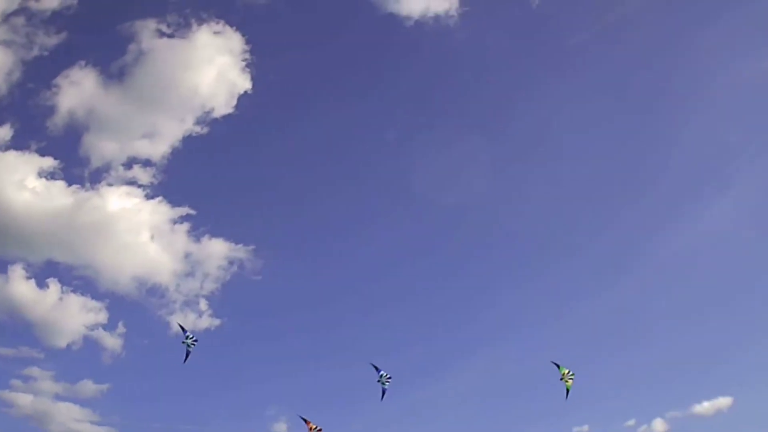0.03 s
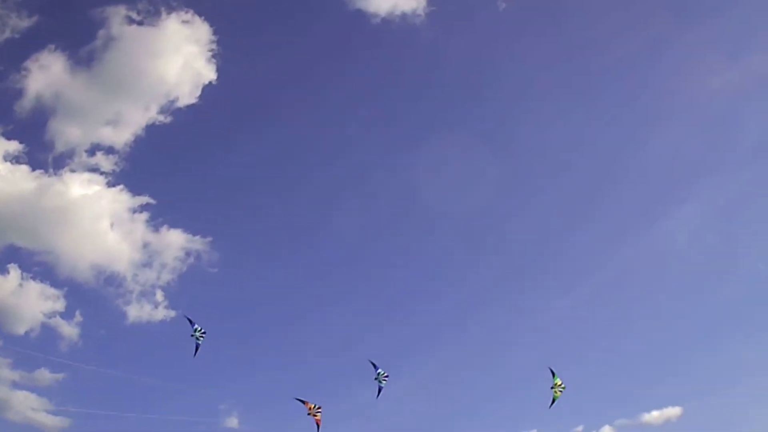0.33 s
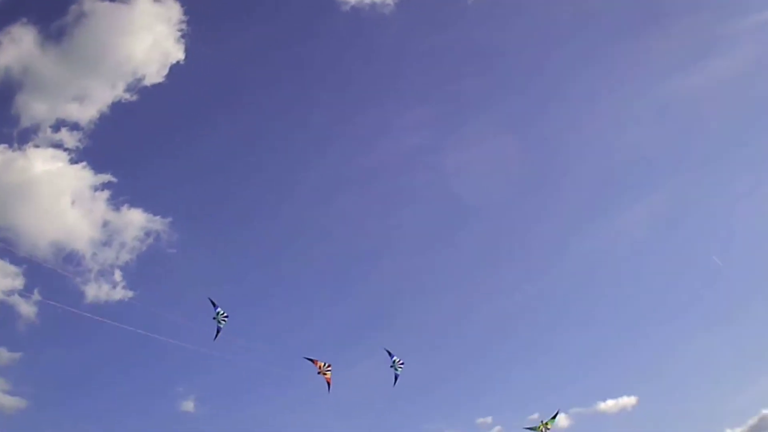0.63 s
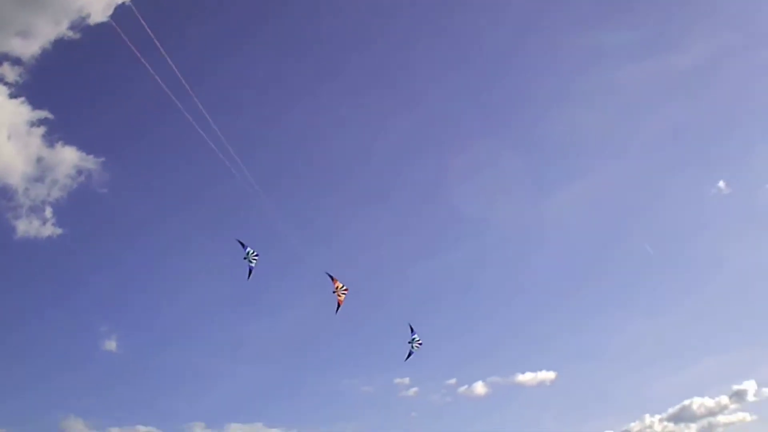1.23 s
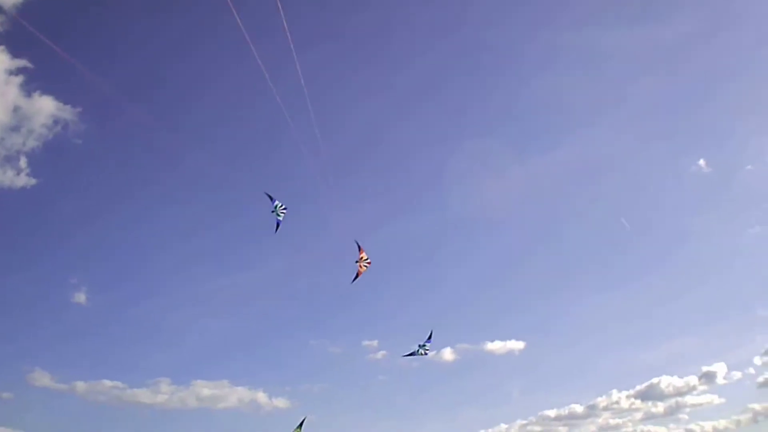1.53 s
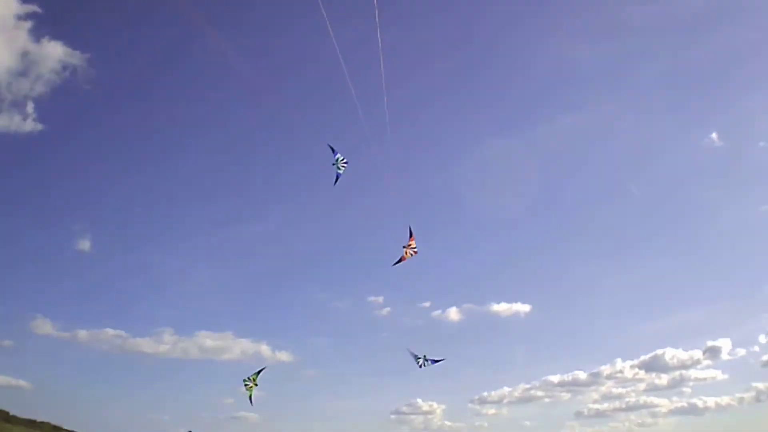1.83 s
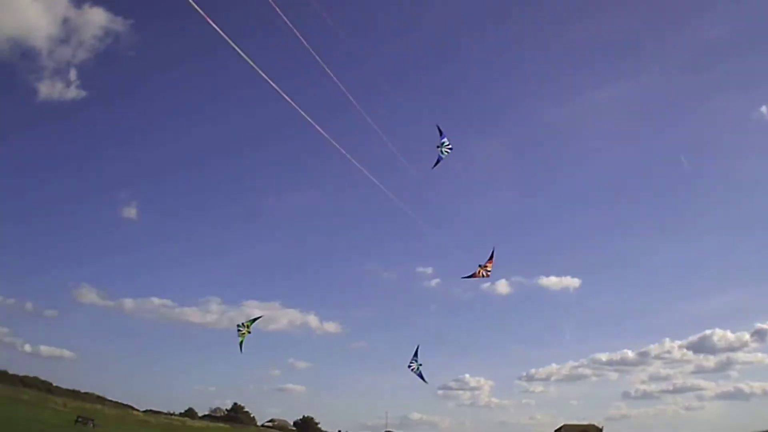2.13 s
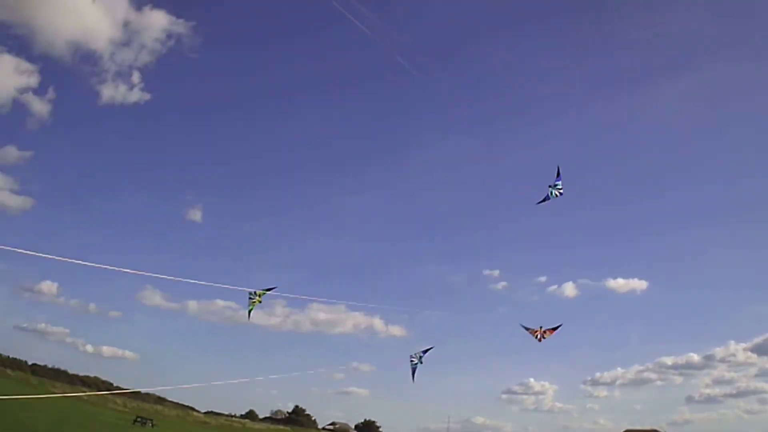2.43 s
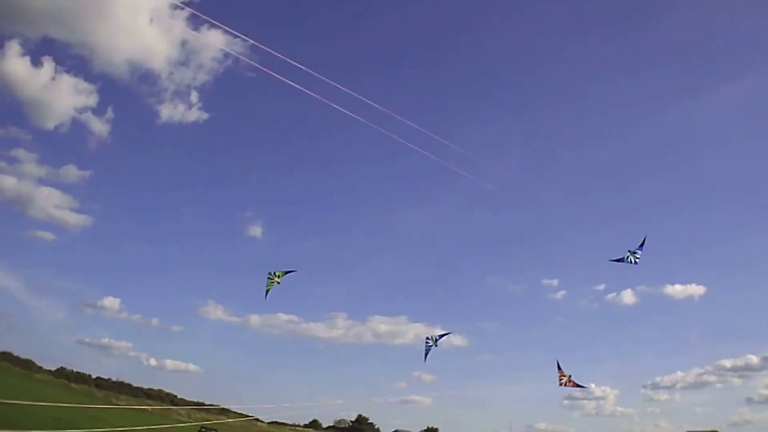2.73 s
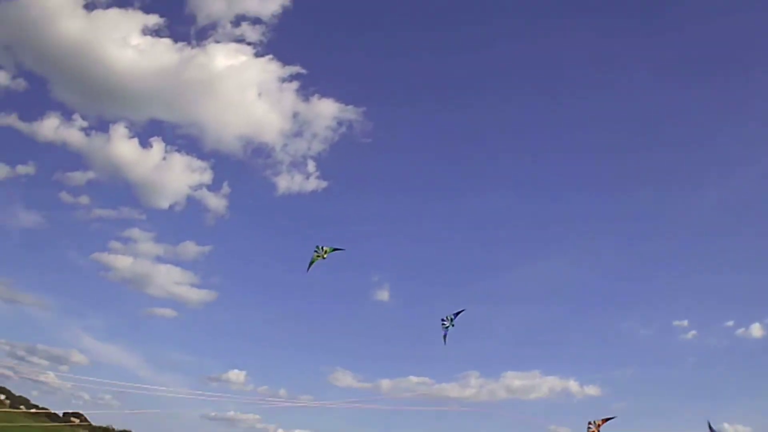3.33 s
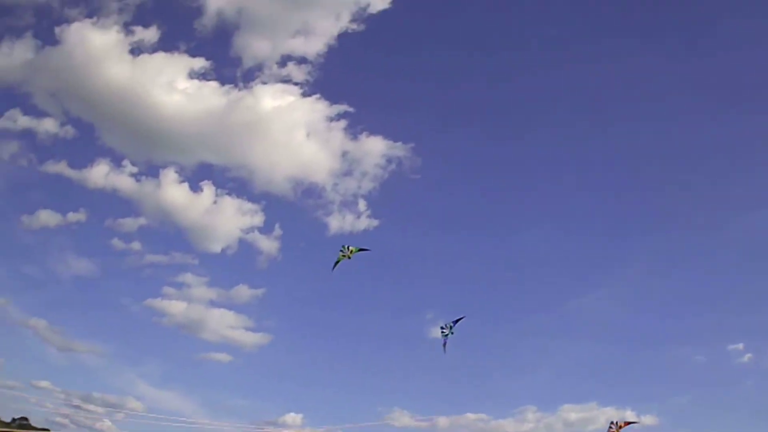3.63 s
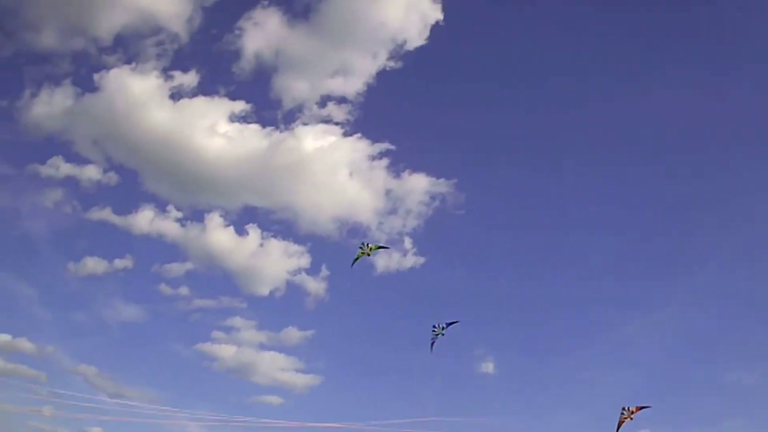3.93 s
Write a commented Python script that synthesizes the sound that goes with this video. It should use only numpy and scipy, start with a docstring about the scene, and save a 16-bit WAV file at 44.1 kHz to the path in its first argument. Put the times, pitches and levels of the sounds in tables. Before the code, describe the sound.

Stunt kites roar and rattle through the air, with gusts buffeting the microphone.

```python
"""A rattling roar over a rush of air: four stunt kites race across a windy hillside. Each sail's trailing
edge flutters about a hundred times a second, every flip a snap, strong and weak in turn, with a few hard
cracks. The ground mirrors the sound, so the roar phases as the kites dive and climb. Taut lines hiss
and whistle. Gusts buffet the microphone and overload it, and the camera adds a faint whine."""
import sys
import numpy as np
from scipy import signal
from scipy.fft import rfft, irfft
from scipy.io import wavfile
from scipy.ndimage import uniform_filter1d, map_coordinates

SR = 44100
rng = np.random.default_rng(int(sys.argv[2]) if len(sys.argv) > 2 else 0)


def log_audio(samples):
    """Write samples as a 16-bit WAV file to the path given in sys.argv[1]."""
    # one column per channel
    frames = np.atleast_2d(samples).T
    # limit to full scale, then quantise
    limited = np.clip(frames, -1, 1)
    pcm = np.round(limited * 32767).astype(np.int16)
    wavfile.write(sys.argv[1], SR, pcm)


N = 176400


def undb(db):
    """Decibels to gain."""
    return 10 ** (np.asarray(db) / 20)


def unit(x):
    """Scale to rms 1."""
    return x / np.sqrt(np.mean(x ** 2))


def curve(table, column=1):
    """One table column, linearly interpolated in time."""
    rows = np.array(table, float)
    return np.interp(np.arange(N) / SR, rows[:, 0], rows[:, column])


def wander(rate_hz):
    """Smooth random drift, rate_hz new values a second; rms 1."""
    hold = max(int(SR / rate_hz), 1)
    steps = np.repeat(rng.standard_normal(N // hold + 1), hold)
    return unit(uniform_filter1d(steps, hold)[:N])


def colour(x, spectrum):
    """Minimum-phase filter through (f/Hz, gain/dB) points; output rms 1."""
    hz, db = np.array(spectrum, float).T
    size = 2 * N
    bins_hz = np.maximum(np.arange(N + 1) * SR / size, 1)
    gain = undb(np.interp(np.log(bins_hz), np.log(hz), db))
    cepstrum = irfft(np.log(gain))
    cepstrum[1:N] *= 2
    cepstrum[N + 1:] = 0
    return unit(irfft(rfft(x, size) * np.exp(rfft(cepstrum)))[:N])


def steady(x, span_s):
    """Even out slow swells: running rms near 1."""
    return x / np.sqrt(uniform_filter1d(x ** 2, max(int(span_s * SR), 1)) + 1e-9)


def hiss_band(centre_hz, width_hz):
    """Noise band round a fixed or gliding centre; rms 1."""
    lowpass = signal.butter(2, width_hz / 2, fs=SR, output="sos")
    baseband = signal.sosfilt(lowpass, rng.standard_normal(N))
    return unit(baseband * np.cos(2 * np.pi * np.cumsum(centre_hz * np.ones(N)) / SR))


# Snap spectrum: f/Hz, relative level/dB
SAIL_SPECTRUM = [(100, -19), (250, -9), (450, -7), (750, -4), (980, 0.5), (1150, 1), (1450, -5.5),
                 (1850, -5), (2200, -11.5), (2700, -13), (3450, -23.5), (3850, -15.5), (4200, -17.5),
                 (4550, -29), (5200, -27), (7000, -39.5), (10000, -51.5), (15000, -80)]

def snaps(starts, gains, size=400):
    """Cloth pulled taut: a pulse, sharper or softer, that swings out and back, then a short shiver."""
    decay_s, decay_spread = .00003, .25
    shiver_db, shiver_s = -19.5, .0011
    swing_hz, swing_width_hz = 1420, 2220
    noise = rng.standard_normal((len(starts), size + 1))
    age_s = np.arange(size) / SR
    pulse = np.exp(-age_s / (decay_s * np.exp(decay_spread * noise[:, :1])))
    shiver = undb(shiver_db) * noise[:, 1:] * np.exp(-age_s / shiver_s)
    shapes = pulse / pulse.sum(axis=1, keepdims=True) + shiver
    places = np.maximum(starts.astype(int), 0)[:, None] + np.arange(size)
    pulls = np.bincount(places.ravel(), (shapes * gains[:, None]).ravel(), N)[:N]
    swing = signal.lfilter(*signal.iirpeak(swing_hz, swing_hz / swing_width_hz, fs=SR), pulls)
    return colour(pulls - 2 * swing, SAIL_SPECTRUM)


def trailing_edge(rate_hz, odd_snap_db, count=560):
    """A sail's edge flutters: one snap per flip, strong and weak in turn, no two alike."""
    drift, scatter_db, jitter_s = .008, 3.5, .0001
    flips = np.cumsum(rate_hz * (1 + drift * wander(6))) / SR
    lateness, strength = rng.standard_normal((count, 2)).T
    order = np.arange(count)
    starts = np.searchsorted(flips, order + rng.random())
    alternation_db = odd_snap_db[np.minimum(starts, N - 1)] * (order % 2)
    gains = undb(alternation_db + scatter_db * np.clip(strength, -2, 1)) * (starts < N)
    return snaps(starts + jitter_s * SR * lateness, gains)


def ground_bounce(x, elevation_deg, mic_height_m=1.6, bounce_db=-10, sound_m_s=343):
    """Direct sound plus its bounce off the grass, which lags more the higher the kite flies."""
    lag_s = 2 * mic_height_m * np.sin(np.radians(elevation_deg)) / sound_m_s
    bounce = map_coordinates(x, [np.arange(N) - lag_s * SR], order=3, mode="mirror")
    return unit(x + undb(bounce_db) * bounce)


# Air past sails and lines: f/Hz, relative level/dB
RUSH_SPECTRUM = [(150, -7), (400, 1.5), (750, -0.5), (1120, -1.5), (1500, -3.5), (2000, -6.5), (3450, -22),
                 (4000, -14.5), (4600, -23), (7000, -38.5), (10000, -42), (15000, -50.5)]

def kite(rate_hz, odd_snap_db, elevation_deg, rush_db=-5.5, surge_db=1.73, surge_hz=4.67):
    """Flutter and rushing air over the ground, surging as the sail fills and slackens."""
    sail = steady(trailing_edge(rate_hz, odd_snap_db), span_s=.13)
    rush = undb(rush_db) * colour(rng.standard_normal(N), RUSH_SPECTRUM)
    return ground_bounce(sail + rush, elevation_deg) * undb(surge_db * wander(surge_hz))


# Nearest kite's flutter, rate set by airspeed: t/s, rate/Hz, mix level/dB, odd-snap gain/dB (all kites)
FLUTTER = [(0, 96, -1, -8.5), (.18, 100, -4.5, 0), (.35, 106, -2.5, 0), (.58, 113, -4, -5),
           (.7, 114.5, -7.5, -14), (.8, 117, -2, -4.5), (.95, 113.6, 0, -10), (1.12, 112, -4, -8),
           (1.28, 111.4, -0.5, -1), (1.55, 106.6, 0, -3), (1.73, 118.7, 3.5, -10.5), (2.2, 98, -6, 1),
           (2.42, 97.7, -0.5, -15), (2.55, 93, -2.5, 0), (2.7, 99, 1, -3), (2.88, 93, -4, 5.5),
           (3.06, 106, 0, -9.5), (3.2, 113, 0.5, -5.5), (3.38, 108.6, -6.5, -7), (3.7, 104, -2.5, -4),
           (4, 103, -1.5, -4)]
# Other kites: rate/nearest rate, mix level/dB
OTHER_KITES = [(1.04, -6.5), (.93, -6.5), (.985, -7.5)]
# Flight paths: t/s, elevation/deg of kites 1 (nearest) to 4
ELEVATION_DEG = [(0, 27.3, 10.7, 24.7, 19), (.75, 26, 22, 22, 9.4), (1.25, 26, 22, 17, 4),
                 (1.7, 33.7, 26, 9, 4.86), (2.25, 24.8, 14.8, 7.7, 16), (2.75, 11.9, 6.7, 12.11, 19),
                 (3.25, 19.6, 4.71, 7.8, 22), (4, 26.6, 5, 3.6, 29.5)]
# Roar envelope: t/s, relative level/dB
ROAR_DB = [(0, -23), (.3, -20), (.62, -22.5), (.72, -22), (.92, -20), (1.0, -23), (1.12, -19),
           (1.27, -22.5), (1.4, -22), (1.75, -24), (2.13, -23), (2.2, -25), (2.3, -25.5), (2.4, -24),
           (2.6, -21.5), (2.95, -23.5), (3.1, -22), (3.5, -20.5), (3.8, -23.5), (4, -25)]
# Treble shelf on the roar: t/s, gain/dB
TREBLE_DB = [(0, 2), (.2, -2), (.65, -1), (.93, 0), (1.15, -.5), (1.6, -2), (1.9, 0.5), (2.3, -1),
             (2.55, -2), (2.7, -5.5), (3, -2.5), (3.12, -1.5), (3.65, -1), (4, 3)]

def kites(trim_db=1.07, shelf_hz=2600):
    """Four kites on their own paths merge into one roar of varying level and brightness."""
    rate_hz, odd_snap_db = curve(FLUTTER), curve(FLUTTER, 3)
    roar = undb(curve(FLUTTER, 2)) * kite(rate_hz, odd_snap_db, curve(ELEVATION_DEG))
    for column, (ratio, db) in enumerate(OTHER_KITES, start=2):
        own_rate_hz = rate_hz * ratio * (1 + .03 * wander(1.5))
        roar += undb(db) * kite(own_rate_hz, odd_snap_db, curve(ELEVATION_DEG, column))
    roar = steady(roar, span_s=.35)
    treble = signal.sosfiltfilt(signal.butter(2, shelf_hz, "high", fs=SR, output="sos"), roar)
    roar += treble * (undb(curve(TREBLE_DB)) - 1)
    return undb(curve(ROAR_DB) + trim_db) * roar


# Gust and eddy envelopes: t/s, relative level/dB
GUST_DB = [(0, -22.5), (.07, -16.5), (.2, -25.5), (.3, -13.5), (.39, -21), (.5, -16), (.74, -16.5),
           (.96, -14), (1.0, -19.5), (1.28, -24), (1.38, -22), (1.62, -15), (1.73, -21.5), (1.98, -23),
           (2.03, -11.5), (2.12, -18.5), (2.21, -6), (2.3, -10.5), (2.38, -12.5), (2.52, -14.5),
           (2.7, -11.5), (2.8, -14), (3.05, -7.5), (3.22, -11.5), (3.3, -14), (3.6, -16.5), (3.8, -13.5),
           (3.87, -21), (4, -6)]
EDDY_DB = [(0, -26.5), (.2, -30.5), (.28, -28), (.45, -26), (.68, -24), (.9, -22), (1.1, -28.5),
           (1.5, -27.5), (1.75, -31), (2.1, -28.5), (2.26, -23.5), (2.43, -31), (2.6, -23.5), (2.8, -24),
           (2.97, -19.5), (3.2, -20.5), (3.5, -21), (3.88, -20.5), (4, -15.5)]
# Gust and eddy spectra: f/Hz, relative level/dB
GUST_SPECTRUM = [(8, -16), (25, -1.5), (45, -3), (68, -1), (100, -5.5), (150, -12.5), (250, -26),
                 (600, -60.5), (2000, -79.5)]
EDDY_SPECTRUM = [(60, -15), (130, -6.5), (190, 1), (270, 2), (350, -5.5), (600, -11), (1500, -24),
                 (5000, -67)]

def wind(gust_trim_db=-.18, eddy_trim_db=-.5, flicker_db=2.04):
    """Gusts rumble on the microphone; smaller eddies flutter over it."""
    rumble = steady(colour(rng.standard_normal(N), GUST_SPECTRUM), span_s=.095)
    eddies = colour(rng.standard_normal(N) * undb(flicker_db * wander(30)), EDDY_SPECTRUM)
    return undb(curve(GUST_DB) + gust_trim_db) * rumble + undb(curve(EDDY_DB) + eddy_trim_db) * eddies


# Line hiss, higher at higher airspeed: t/s, centre f/Hz, level/dB
LINE_HISS = [(0, 5300, -68), (.4, 5700, -58), (.8, 6300, -68), (1.1, 8300, -65), (1.4, 8000, -57.5),
             (1.6, 7600, -62), (1.8, 7300, -56), (2.1, 7000, -59), (2.4, 6000, -64), (3, 5800, -56),
             (3.35, 6300, -53), (3.65, 6000, -56), (4, 6800, -55)]
# Line whistles: middle t/s, length/s, f/Hz, level/dB
LINE_WHISTLES = [(.37, .55, 5750, -54), (.6, 0.81, 3945, -49), (1.38, .2, 4900, -51),
                 (1.88, .65, 4680, -54), (3.3, .2, 7100, -62)]

def flying_lines(hiss_width_hz=1840, whistle_width_hz=320):
    """Taut lines shed eddies: a gliding hiss and brief narrow whistles."""
    t = np.arange(N) / SR
    out = undb(curve(LINE_HISS, 2)) * hiss_band(curve(LINE_HISS), hiss_width_hz)
    for middle_s, length_s, hz, db in LINE_WHISTLES:
        swell = np.cos(np.pi * np.clip((t - middle_s) / length_s, -.5, .5))
        out += undb(db) * swell * hiss_band(hz, whistle_width_hz)
    return out


# Whine tones: f/Hz, rms level/dB
WHINE_TONES = [(13819, -84), (13937, -71), (14056, -71), (14174, -86)]

def camera_whine():
    """A faint cluster of high tones from the camera's electronics."""
    t = np.arange(N) / SR
    return sum(np.sqrt(2) * undb(db) * np.sin(2 * np.pi * (hz * t + rng.random()))
               for hz, db in WHINE_TONES)


# Hardest sail snaps: t/s, peak level/dB
SAIL_CRACKS = [(.046, -16), (.681, -6.5), (.717, -2), (.862, -16), (0.889, -12), (1.074, -8), (1.130, -4.5),
               (1.185, -6), (1.407, -11), (1.530, -6.5), (1.711, -9), (2.392, -6), (2.435, -8.5),
               (2.474, -12), (2.559, -6), (2.613, -10), (3.038, -8)]

def hard_cracks(band_hz=(626, 2690), size=700):
    """A sail snaps much harder and rings in the middle of its range."""
    starts = (np.array(SAIL_CRACKS)[:, 0] * SR).astype(int)
    bandpass = signal.butter(2, band_hz, "band", fs=SR, output="sos")
    ringing = signal.sosfilt(bandpass, snaps(starts, np.ones(len(starts))))
    out = np.zeros(N)
    for start, (_, db) in zip(starts, SAIL_CRACKS):
        crack = ringing[start:start + size]
        out[start:start + size] += undb(db) * crack / np.abs(crack).max()
    return out


# Single wind buffets: t/s, push length/s, peak level/dB
WIND_BUFFETS = [(.673, .007, -6), (.732, 0.012, -5), (.857, .009, -3), (.962, 0.0066, -6.5),
                (2.033, 0.0091, -3.5), (2.184, 0.0067, 2.5), (2.217, 0.0079, 2.5), (2.271, .010, -2),
                (3.055, .010, 0.5), (3.084, 0.0068, -1.5), (3.231, 0.014, -0.5), (3.969, .009, 0)]

def buffets():
    """A lump of air strikes the microphone: a push with a pressure dip on either side."""
    t = np.arange(N) / SR
    out = np.zeros(N)
    for middle_s, length_s, db in WIND_BUFFETS:
        offset_squared = (2 * (t - middle_s) / length_s) ** 2
        out += undb(db) * (1 - offset_squared) * np.exp(-offset_squared / 2)
    return out


def scene(mic_hiss_db=-67):
    """Kites and lines overhead, wind at the microphone, the camera's whine and hiss; mono."""
    mic_hiss = undb(mic_hiss_db) * rng.standard_normal(N)
    overhead = kites() + hard_cracks() + flying_lines()
    return (overhead + wind() + buffets() + camera_whine() + mic_hiss)[None, :]


def record(dry, ceiling=.69, cutoff_hz=15600):
    """The strongest gusts overload the input, flattening the peaks; a steep low-pass follows."""
    flattened = dry / (1 + (dry / ceiling) ** 16) ** (1 / 16)
    return signal.sosfilt(signal.ellip(8, .2, 70, cutoff_hz, fs=SR, output="sos"), flattened)


dry = scene()
out = record(dry)
log_audio(out)
```